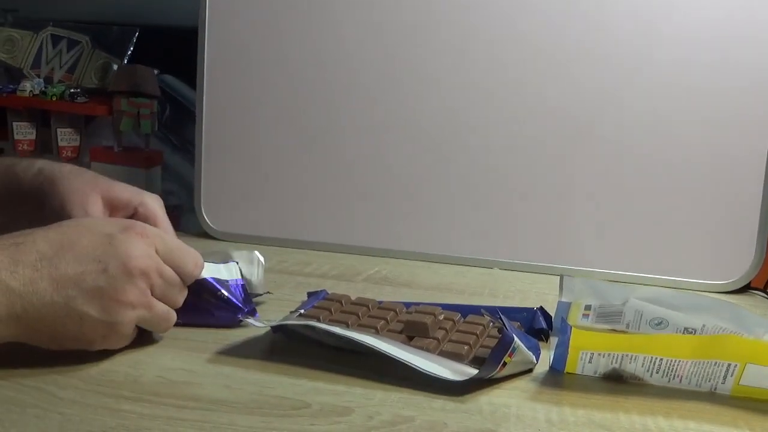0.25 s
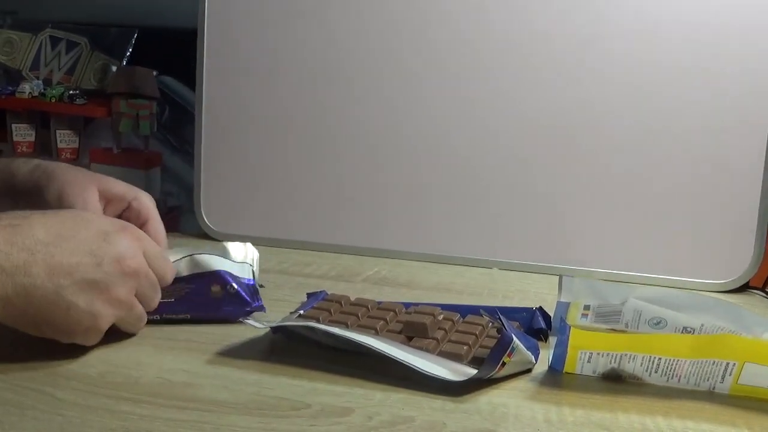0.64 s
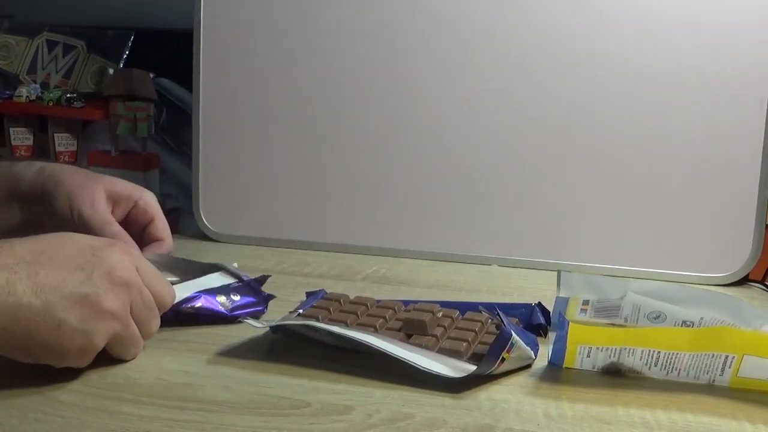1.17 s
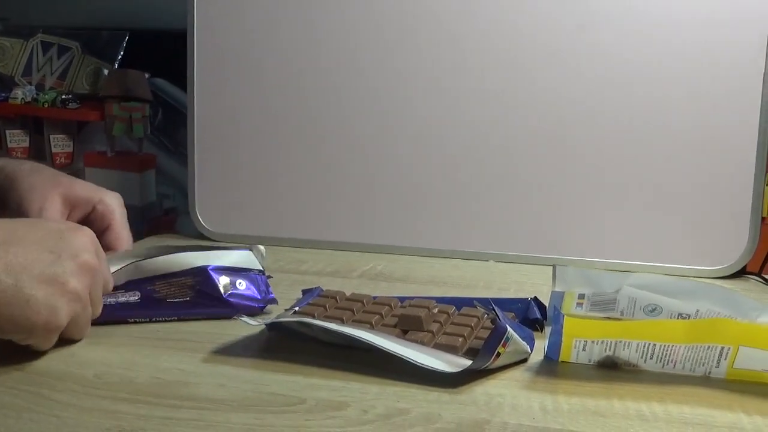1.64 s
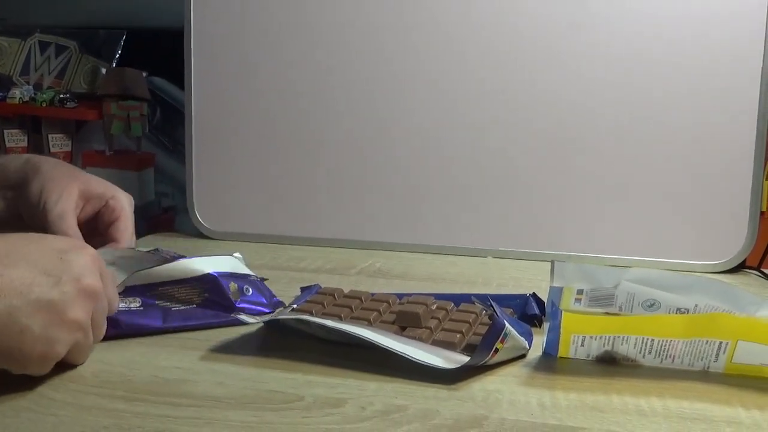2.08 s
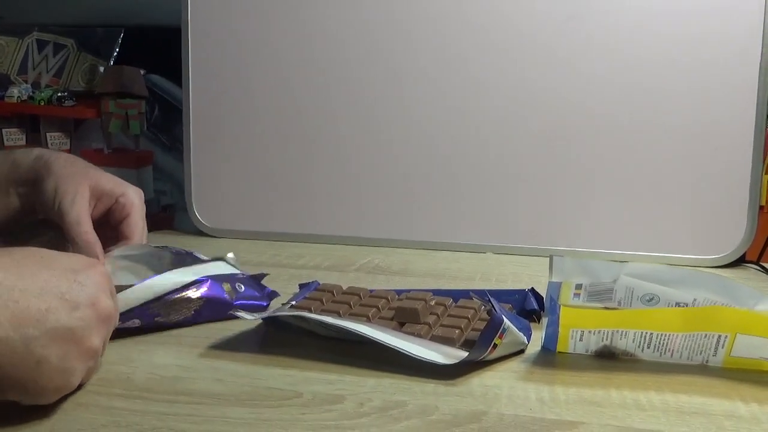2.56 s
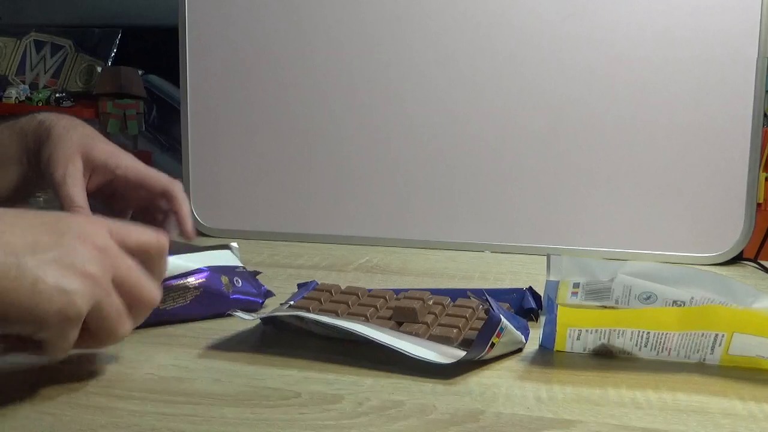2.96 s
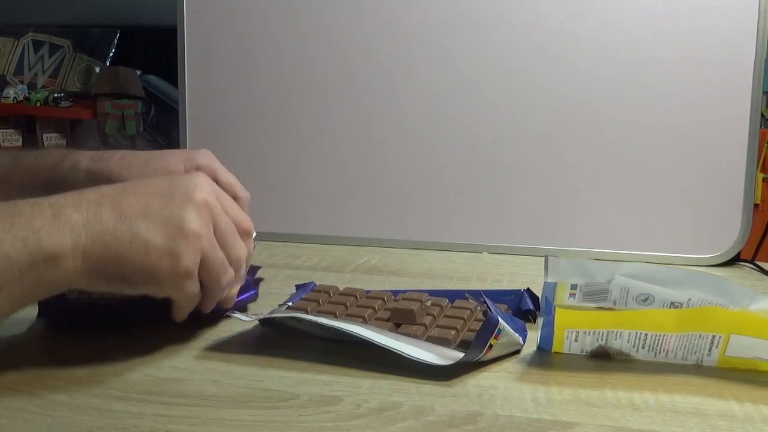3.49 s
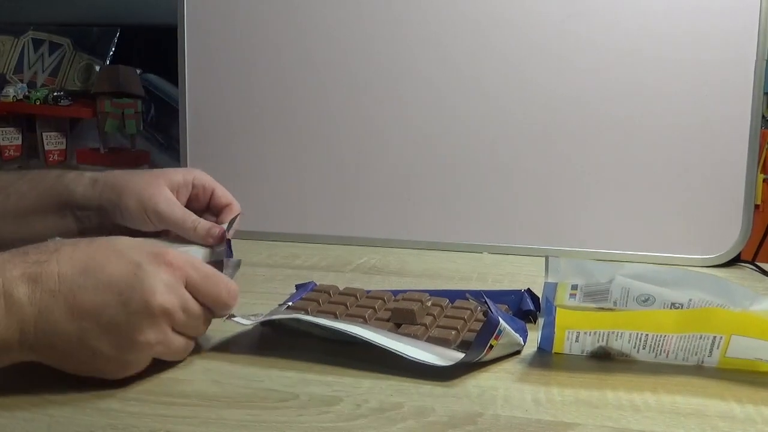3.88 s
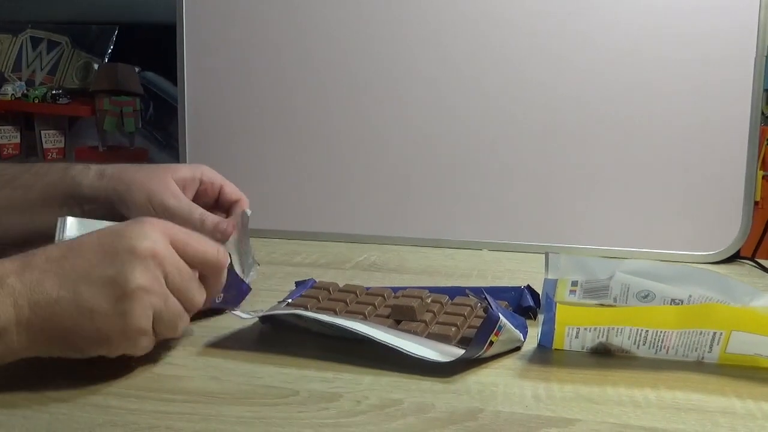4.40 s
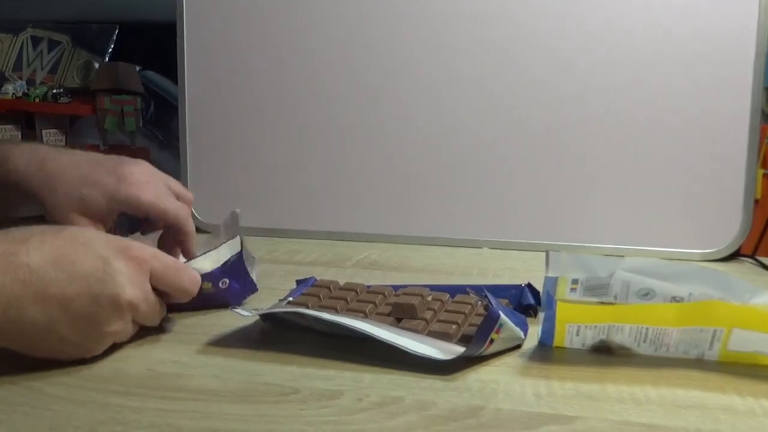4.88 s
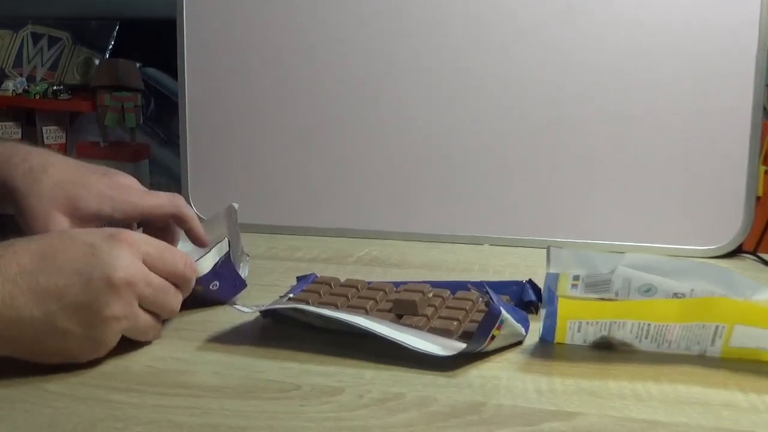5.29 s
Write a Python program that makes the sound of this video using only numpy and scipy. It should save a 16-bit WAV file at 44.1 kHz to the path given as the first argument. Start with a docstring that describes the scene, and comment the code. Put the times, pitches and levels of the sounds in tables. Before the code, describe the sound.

Close, nearly mono, in a small room: hands peel a foil and paper wrapper off a chocolate bar on a wooden table. Light rustle and soft taps start it, then loud snaps crowd together around one second. Irregular crackles and sliding rustle follow, with another cluster near two seconds. A hard knock of the bar lands near 4.4 seconds, then small snaps trail off over faint steady room noise.

```python
"""At a wooden table in a small room, a close, almost mono recording position hears two hands peel a foil
and paper wrapper off a chocolate bar. Rustle and soft taps come first, then the hardest snaps crowd
together near 1 s. Single snaps, a few dull finger taps and dense crackles follow, all clicks shaped by
a patch filter, over sliding rustle and soft table booms from two decaying sines. Near 4.4 s the bar
knocks hard, its modes ringing; smaller snaps trail off. Room echoes and steady noise run throughout."""
import sys
import numpy as np
from scipy import signal
from scipy.fft import rfft, irfft
from scipy.io import wavfile

SR = 44100
rng = np.random.default_rng(int(sys.argv[2]) if len(sys.argv) > 2 else 0)


def log_audio(samples):
    """Write samples as a 16-bit WAV file to the path given in sys.argv[1]."""
    # one column per channel
    frames = np.atleast_2d(samples).T
    # limit to full scale, then quantise
    limited = np.clip(frames, -1, 1)
    pcm = np.round(limited * 32767).astype(np.int16)
    wavfile.write(sys.argv[1], SR, pcm)


N = 244525
TIME = np.arange(N) / SR  # seconds

# creases snapping over, with a few dull low finger taps among them:
# start_s, level_db (rms of the first 6 ms), pitch_hz (of the patch filter)
SNAP_EVENTS = [(.035, -22.5, 1600), (.053, -25, 4280), (.227, -22, 3060), (.279, -31, 3000),
               (0.334, -41, 1530), (0.4011, -17, 3320), (.501, -38.5, 1430), (.55, -34, 810),
               (0.6355, -31, 1020), (.691, -41, 1700), (.7231, -19, 3250), (0.756, -16, 4870),
               (0.771, -20, 4900), (0.7944, -14, 4370), (.804, -18.5, 2800), (0.8555, -15, 3250),
               (0.8761, -23.5, 2250), (0.9129, -20.5, 2480), (.9361, -28, 3130), (0.9427, -17, 3170),
               (1.0101, -8.5, 4270), (1.0392, -13, 1920), (1.1064, -14, 1460), (1.1188, -24, 1710),
               (1.1597, -16, 1940), (1.185, -15, 2200), (1.1868, -20, 1930), (1.2576, -29.5, 4440),
               (1.3226, -28, 3780), (1.3626, -27, 4600), (1.378, -27.5, 2300), (1.4777, -25, 4730),
               (1.524, -23, 3900), (1.575, -28.5, 4300), (1.5994, -31.5, 1580), (1.773, -31.5, 3380),
               (1.7999, -23.5, 5560), (1.8302, -33.5, 2400), (1.8806, -20.5, 2900), (1.9237, -22.5, 3200),
               (1.966, -20.5, 3150), (2.019, -19.5, 6050), (2.0884, -22, 3770), (2.105, -19.5, 4000),
               (2.1166, -17, 3220), (2.143, -20, 3060), (2.159, -21, 3200), (2.2948, -30.5, 1830),
               (2.3746, -21, 2650), (2.45, -20, 3080), (2.472, -26.5, 2800), (2.4957, -27, 6960),
               (2.515, -19, 2020), (2.5697, -18.5, 2800), (2.611, -13, 3230), (2.6583, -21.5, 3530),
               (2.689, -27.5, 2680), (2.7633, -25.5, 1400), (2.7767, -20, 3720), (2.842, -35.5, 3020),
               (2.9202, -30.5, 5130), (3.035, -28, 1700), (3.0936, -28, 1040), (3.118, -36, 1590),
               (3.144, -39, 1300), (3.178, -39.5, 2000), (3.3547, -27.5, 3070), (3.434, -25.5, 2430),
               (3.4889, -22.5, 5300), (3.515, -28, 1400), (3.5665, -21, 3100), (3.6352, -25, 3620),
               (3.718, -23, 4470), (3.7556, -23.5, 4700), (3.7757, -22, 3620), (3.8798, -22, 4500),
               (3.9041, -19, 3080), (4.039, -37.5, 3930), (4.0869, -19.5, 5340), (4.147, -29.5, 3700),
               (4.1765, -41, 3080), (4.2289, -37, 2000), (4.363, -28.5, 2980), (4.3773, -11.5, 1710),
               (4.45, -31.5, 1900), (4.5315, -25.5, 3500), (4.557, -34, 3160), (4.783, -33.5, 2640),
               (4.8476, -22, 3500), (4.884, -24, 3800), (5.026, -33, 2200), (5.1053, -34, 2400),
               (5.1185, -25, 3500), (5.234, -33.5, 3630), (5.3147, -28.5, 3140), (5.3719, -33, 1900),
               (5.4016, -36, 4200), (5.4775, -38.5, 5100), (5.5221, -37.5, 3240)]


def snaps_and_taps(ring_t60=0.018, ring_db=1, shiver_t60=0.11, shiver_db=-9,
                   softening=0.21, firm_db=-17, travel_s=0.00123, size=3072):
    """Creases snap, a few fingers tap: a sharp pulse, short bounces and a longer shiver in a patch filter."""
    out = np.zeros(N)
    attack = TIME[:size] < 0.006
    for start_s, level_db, pitch_hz in SNAP_EVENTS:
        bounces = undb(ring_db) * burst(size, 9000, ring_t60)
        shiver = undb(shiver_db) * burst(size, 2000, shiver_t60)
        push = bounces + shiver
        # firm events start at once, weak ones more gradually
        push[0] = rng.choice([-1, 1]) * undb(softening * (level_db - firm_db))
        # each event draws its own travel time, up to travel_s, and its own resonances
        push = disperse(push, travel_s * rng.random())
        snap = colour(push, patch_spectrum(pitch_hz), ripple_db=4)
        add(out, start_s, undb(level_db) * snap / rms(snap[attack]))
    return out


# runs of tiny creases giving way together: start_s, length_s, level_db (before the mix), pitch_hz
CRUMPLE_EVENTS = [(0.749, 0.038, -38, 3400), (0.867, 0.011, -18.5, 2270), (0.911, 0.076, -23.5, 3560),
                  (0.997, 0.046, -20.5, 3200), (1.975, 0.034, -30, 1920), (2.02, 0.021, -22, 1480),
                  (2.037, .126, -33.5, 2590), (2.57, 0.062, -26.5, 2960), (2.765, 0.033, -29, 1890),
                  (3.468, 0.04, -30.5, 2400), (3.633, 0.03, -28.5, 2860), (3.765, 0.047, -25, 2630),
                  (3.887, 0.041, -22.5, 3070), (4.074, 0.03, -24.5, 4300), (4.358, 0.012, -30.5, 3460),
                  (4.823, 0.012, -35, 4500), (4.891, 0.026, -33, 3880), (5.124, .008, -30.5, 3370)]


def crumples(release_t60=0.071, size=16384):
    """An avalanche of tiny creases lasts while the fingers pull, then dies away."""
    out, t = np.zeros(N), TIME[:size]
    for start_s, length_s, level_db, pitch_hz in CRUMPLE_EVENTS:
        clicks = grains(size, 2000, 4.4)
        crackle = colour(clicks, patch_spectrum(pitch_hz), ripple_db=3)
        release = fade(np.maximum(t - length_s, 0), release_t60)
        add(out, start_s, undb(level_db) * crackle / rms(crackle) * release)
    return out


# colour of the foil that all patches share: freq_hz, level_db
FOIL_COLOUR = [(60, -14), (180, -6), (370, 2.5), (700, 0.5), (1450, 2.5), (2700, -2.5), (4800, 0),
               (6700, -5.5), (11000, -13.5)]
PATCH_RISE_DB_PER_OCT, PATCH_FALL_DB_PER_OCT = 3.5, 10  # slopes below and above the patch's pitch
PATCH_RING_DB, PATCH_RING_OCT = 1, 0.22  # height and width of the extra peak at that pitch


def patch_spectrum(pitch_hz, count=40):
    """A patch radiates best at its own pitch, less below and much less above."""
    foil_hz, foil_db = np.transpose(FOIL_COLOUR)
    hz = np.geomspace(foil_hz[0], foil_hz[-1], count)
    shared_db = np.interp(np.log(hz), np.log(foil_hz), foil_db)
    octaves = np.log2(hz / pitch_hz)
    slopes_db = np.minimum(PATCH_RISE_DB_PER_OCT * octaves, -PATCH_FALL_DB_PER_OCT * octaves)
    ring_db = PATCH_RING_DB * np.exp(-(octaves / PATCH_RING_OCT) ** 2)
    return np.transpose([hz, shared_db + slopes_db + ring_db])


# colour of the sliding sheet: freq_hz, level_db (relative)
SHEET_COLOUR = [(100, -4.5), (350, -6.5), (700, -0.5), (1500, -4.5), (2800, 0), (4900, -2.5), (7000, -14),
                (11000, -31)]
TICK_LOW_HZ, TICK_HIGH_HZ = 1390, 5500  # range of the patches that tick as the sheet slides


def slide(tick_db=2, tick_t60=0.037, count=16, size=1024):
    """Foil rubs on skin and chocolate: fine rustle and ticks from many patches, both following the motion."""
    rustle = colour(grains(N, 1500, 3.9), SHEET_COLOUR)
    ticks = np.zeros(N)
    for pitch_hz in np.geomspace(TICK_LOW_HZ, TICK_HIGH_HZ, count):
        patch = colour(burst(size, SR / 4, tick_t60), patch_spectrum(pitch_hz), ripple_db=6)
        ticks += signal.oaconvolve(grains(N, 4, 2.7), patch / rms(patch))[:N]
    return (rustle / rms(rustle) + undb(tick_db) * ticks / rms(ticks)) * motion()


# pulls of the fingers that slide the sheet along: start_s, length_s, level_db (before the mix)
PULL_EVENTS = [(0, 0.14, -41), (.26, .16, -44.5), (0.577, 0.12, -38.5), (0.781, 0.26, -33),
               (1.2, 0.16, -44), (1.528, 0.05, -36.5), (1.77, 0.41, -39.5), (2.349, 0.36, -36.5),
               (2.772, .2, -50), (3.055, 0.54, -47), (3.437, 0.4, -39.5), (3.868, 0.32, -44.5),
               (4.31, 0.06, -42), (4.515, 0.14, -48), (4.773, 0.17, -36), (4.967, 0.29, -43.5),
               (5.296, 0.055, -37.5), (5.453, 0.12, -47.5)]
PULL_ATTACK_S, PULL_RELEASE_T60_S = 0.012, 0.15
HOLDING_DB = -51  # before the mix; the sheet still stirs faintly while it is only held


def motion():
    """How strongly the sheet slides: each pull takes hold, lasts and lets go; their powers add."""
    power = undb(HOLDING_DB) ** 2
    for start_s, length_s, level_db in PULL_EVENTS:
        attack = np.clip((TIME - start_s) / PULL_ATTACK_S, 0, 1)
        release = fade(np.clip(TIME - start_s - length_s, 0, 2), PULL_RELEASE_T60_S)
        power = power + (undb(level_db) * attack * release) ** 2
    return np.sqrt(power)


# the bar knocking and settling: start_s, level_db (before a final halving),
# contact_hz (above it the contact is too soft to excite the bar)
KNOCK_EVENTS = [(.087, -24.5, 590), (0.13, -27.5, 420), (4.3775, -19, 4930), (4.3971, -20, 1860),
                (4.967, -32.5, 800)]
# what the bar and table top ring with: freq_hz (before a slight random detune), level_db (relative), t60_s
BAR_MODES = [(330, -23, .13), (406, -2.5, 0.12), (979, 6, .07), (1570, -12, 0.074), (1940, 21, 0.02),
             (1830, 2, 0.049), (2700, 12, 0.012)]


def knocks(detune=0.0016, clatter_db=-3, clatter_t60=0.1, hard_hz=1800):
    """The bar rings with the table top and clatters in its wrapper; soft contacts reach only low modes."""
    out, t = np.zeros(N), TIME[:SR // 4]
    clatter_colour = [(170, -12.5), (310, -1), (600, -6.5), (1000, -2),
                      (1700, -10), (2900, 6), (6000, -42)]  # freq_hz, level_db
    for start_s, level_db, contact_hz in KNOCK_EVENTS:
        ring = np.zeros(len(t))
        for hz, mode_db, t60 in BAR_MODES:
            mode_hz = hz * (1 + detune * rng.standard_normal())
            sign = rng.choice([-1, 1])
            ring += undb(mode_db) * sign * np.sin(2 * np.pi * mode_hz * t) * fade(t, t60)
        clatter = colour(burst(len(t), 9000, clatter_t60), clatter_colour)
        hardness = min(contact_hz / hard_hz, 1)
        blow = ring + undb(clatter_db) * hardness * clatter * rms(ring) / rms(clatter)
        contact = signal.butter(2, min(contact_hz, SR / 4), fs=SR, output="sos")
        add(out, start_s, undb(level_db) * signal.sosfilt(contact, blow) / 2)
    return out


# hands and bar pressing on the table: start_s, low_mode_db, high_mode_db
BUMP_EVENTS = [(.005, -55, -37), (0.634, -48, -45), (1.031, -49, -42), (1.194, -43, -56), (2.031, -45, -42),
               (2.775, -42.5, -48), (3.793, -42, -41), (3.99, -63, -40.5), (4.382, -30, -43),
               (4.434, -64, -40), (4.933, -44, -42)]
# the two low modes of the table: freq_hz, t60_s
TABLE_MODES = [(50, 1), (97.5, 1)]


def table(push_s=0.0025):
    """Soft bumps swing the table top in its two lowest modes."""
    out, t = np.zeros(N), TIME[:SR]
    onset = 1 - np.exp(-t / push_s)
    for start_s, *levels_db in BUMP_EVENTS:
        for (hz, t60), level_db in zip(TABLE_MODES, levels_db):
            boom = np.sin(2 * np.pi * hz * t) * fade(t, t60) * onset
            add(out, start_s, undb(level_db) * boom)
    return out


ROOM_T60_S, ROOM_DB = 0.13, -5.5


def room(x, count=110):
    """Table, board and walls echo in a short, bright tail, with a fresh random pattern per short stretch."""
    out, start = np.zeros(N), 0
    echo_colour = [(130, 8), (400, 0.0), (3200, -4.5), (5500, 4.0), (11000, 7.5)]  # freq_hz, level_db
    for stretch in np.array_split(x, count):
        echoes = colour(burst(SR // 4, SR / 4, ROOM_T60_S), echo_colour)
        add(out, start / SR, signal.fftconvolve(stretch, echoes))
        start += len(stretch)
    return undb(ROOM_DB) * out


# steady room noise and hiss: freq_hz, level_db (relative)
AIR_COLOUR = [(25, -19), (50, 22), (130, 13.5), (300, 11.5), (900, 8.5), (3200, 3), (4900, -31),
              (6500, -45), (11000, -64)]
AIR_DB = -59


def air():
    """Steady room noise and hiss: coloured white noise at rms 1."""
    noise = colour(rng.standard_normal(N), AIR_COLOUR)
    return noise / rms(noise)


def burst(size, per_s, t60):
    """A dying shower of tiny clicks with unit energy."""
    x = grains(size, per_s, 4.0) * fade(TIME[:size], t60)
    return x / np.linalg.norm(x)


def grains(n, per_s, spread_db):
    """Random tiny clicks of either sign, a few much larger than the rest; rms 1."""
    size_db = spread_db * np.minimum(rng.standard_exponential(n), np.pi)
    hits = rng.random(n) < per_s / SR
    x = hits * rng.choice([-1, 1], n) * undb(size_db)
    return x / rms(x)


def disperse(x, lag_s):
    """Bending waves carry treble faster than bass; lag_s is their travel time at 1 kHz."""
    hz = np.arange(len(x) + 1) * SR / (2 * len(x))
    phase = -4 * np.pi * lag_s * np.sqrt(1000 * hz)
    return irfft(rfft(x, 2 * len(x)) * np.exp(1j * phase))[:len(x)]


def colour(x, points, ripple_db=0, size=1024):
    """Minimum-phase filter through (Hz, dB) points keeps attacks sharp; ripple adds random resonances."""
    hz, db = np.transpose(points)
    bins = np.maximum(np.arange(size // 2 + 1) * SR / size, 1)
    ripple = np.interp(bins, np.linspace(0, SR / 2, 64), rng.uniform(-1, 1, 64))
    gain_db = np.interp(np.log(bins), np.log(hz), db) + ripple_db * ripple
    # folding the cepstrum makes the filter causal
    cepstrum = irfft(np.log(undb(gain_db)))
    cepstrum[1:size // 2] *= 2
    cepstrum[size // 2 + 1:] = 0
    impulse = irfft(np.exp(rfft(cepstrum)))
    return signal.fftconvolve(x, impulse)[:len(x)]


def undb(db):
    """Decibels to gain."""
    return 10 ** (np.asarray(db) / 20)


def rms(x):
    """Root mean square."""
    return np.sqrt(np.mean(x ** 2) + 1e-18)


def fade(t, t60):
    """Exponential decay, 60 dB down after t60."""
    return np.exp(-np.log(1000) * t / t60)


def add(out, start_s, x):
    """Mix x into out from start_s."""
    i = int(np.clip(start_s * SR, 0, N - 1))
    out[i:i + len(x)] += x[:N - i]


def scene(snap_db=0, crumple_db=-1, slide_db=-5, treble_width=0.0215, apart_db=-20):
    """Wrapper, bar and table in the room, as an almost mono image."""
    wrapper = undb(snap_db) * snaps_and_taps() + undb(crumple_db) * crumples() + undb(slide_db) * slide()
    near = wrapper + knocks()
    mid = near + room(near) + table() + undb(AIR_DB) * air()
    # a faint treble-weighted difference and a little separate noise widen the image slightly
    treble_difference = treble_width * np.gradient(mid)
    side = treble_difference + undb(AIR_DB + apart_db) * air()
    return np.array([mid + side, mid - side])


TOP_HZ = 11200


def record(dry):
    """The microphone drops the deepest bass, peaks beyond full scale clip, and the top is cut."""
    bass_cut = signal.butter(2, 38, "high", fs=SR, output="sos")
    top_cut = signal.ellip(10, 0.2, 70, TOP_HZ, fs=SR, output="sos")
    lean = signal.sosfilt(bass_cut, dry)
    return signal.sosfilt(top_cut, np.clip(lean, -1, 1))


dry = scene()
out = record(dry)
log_audio(out)
```